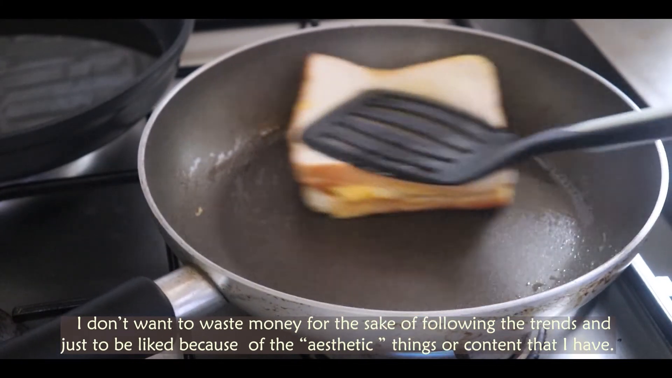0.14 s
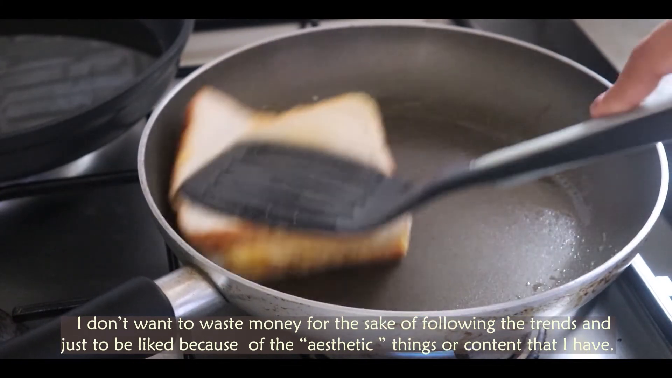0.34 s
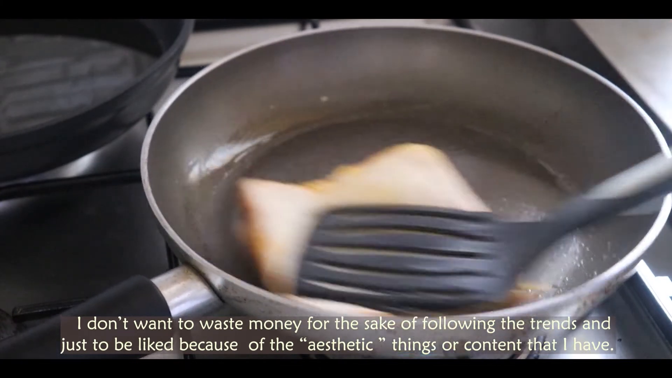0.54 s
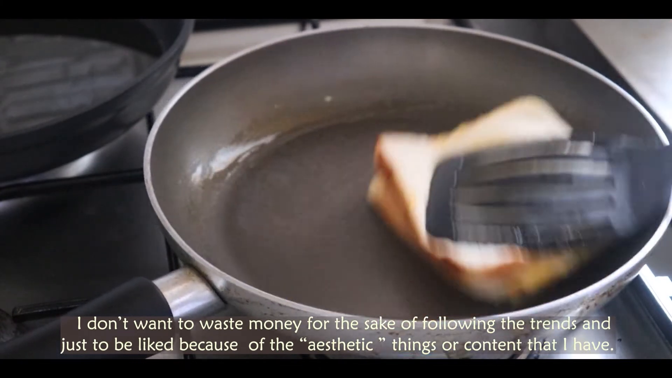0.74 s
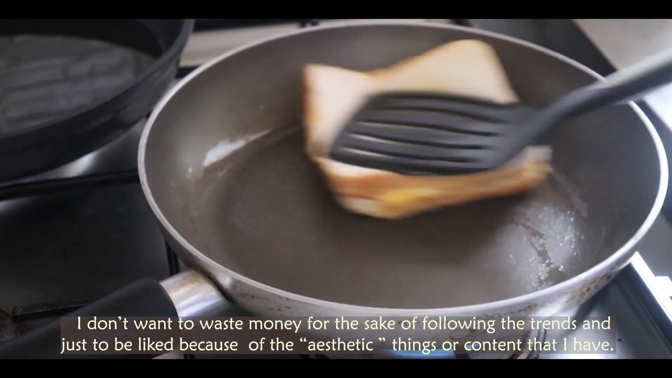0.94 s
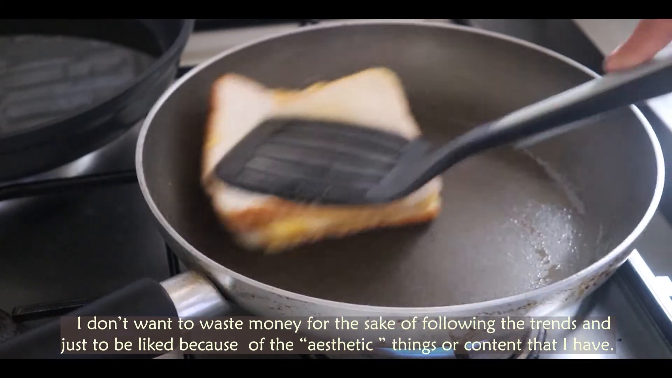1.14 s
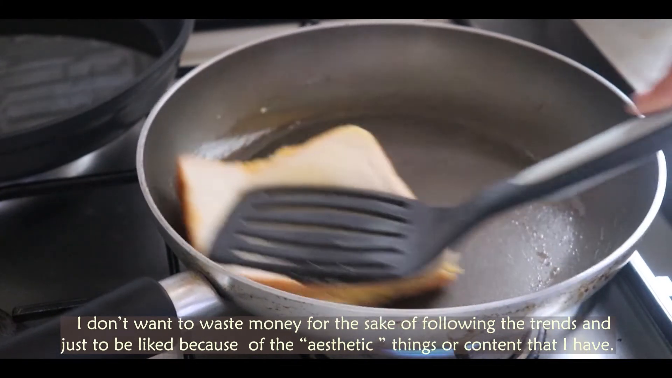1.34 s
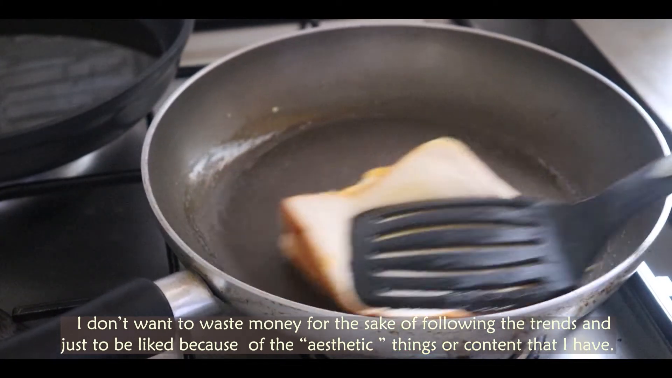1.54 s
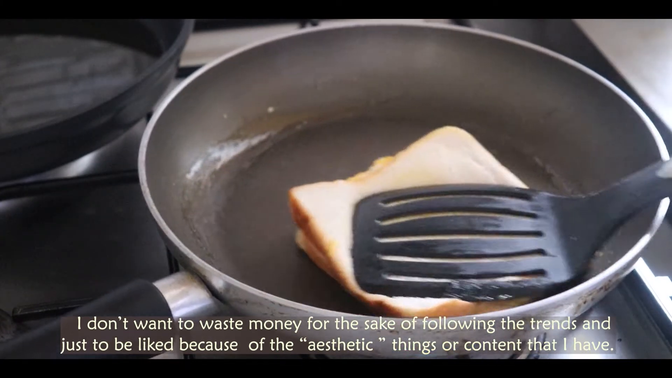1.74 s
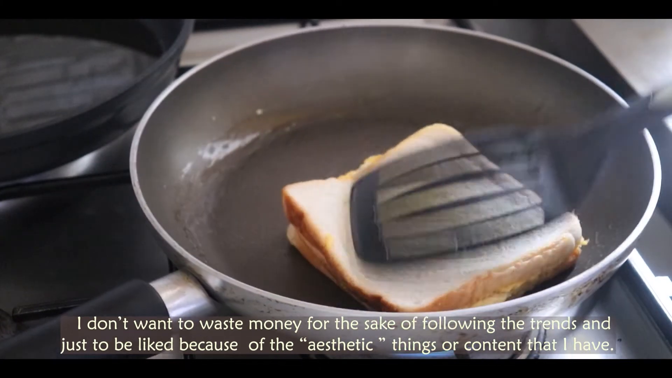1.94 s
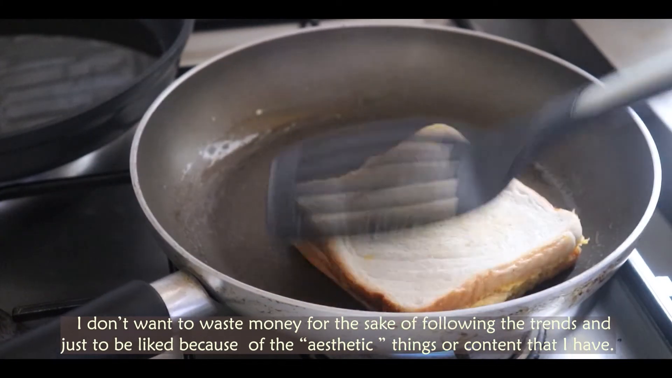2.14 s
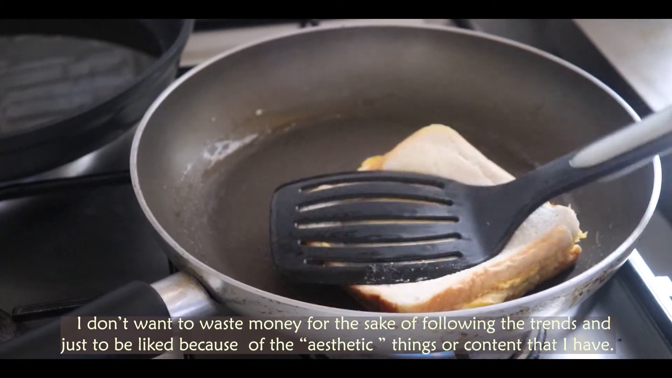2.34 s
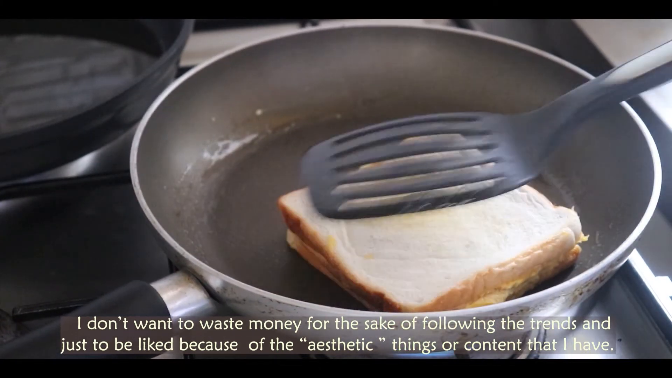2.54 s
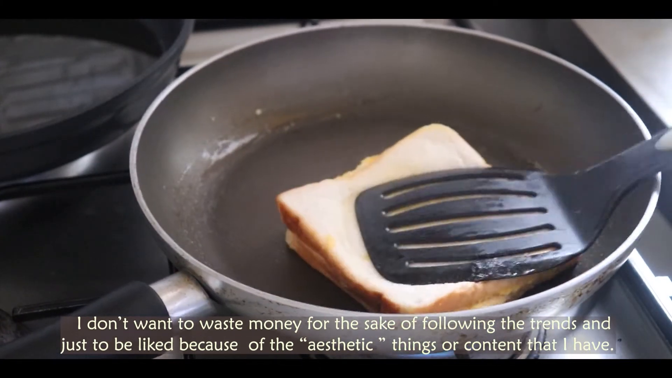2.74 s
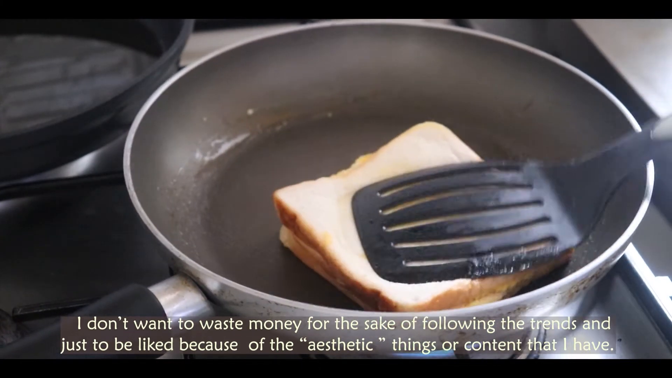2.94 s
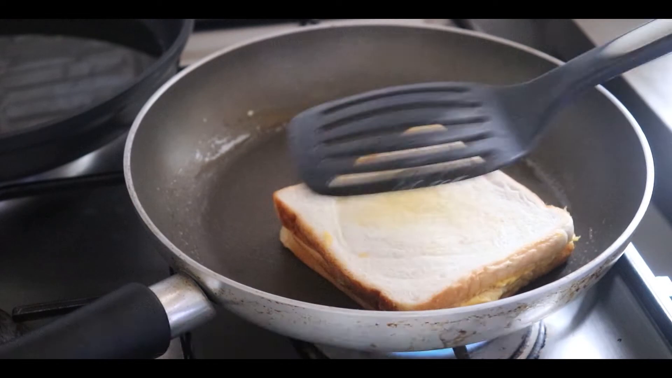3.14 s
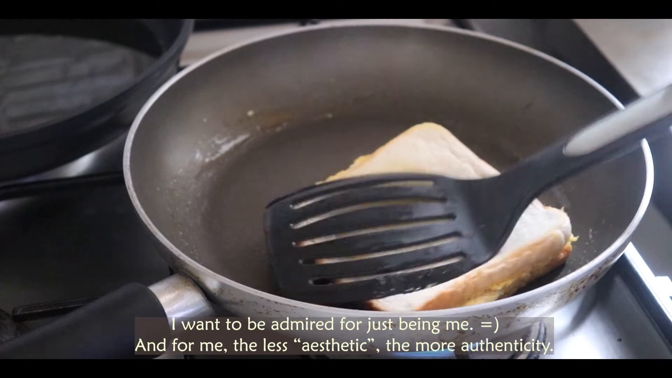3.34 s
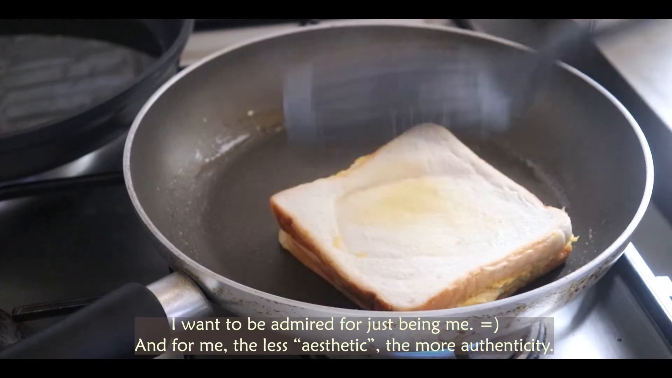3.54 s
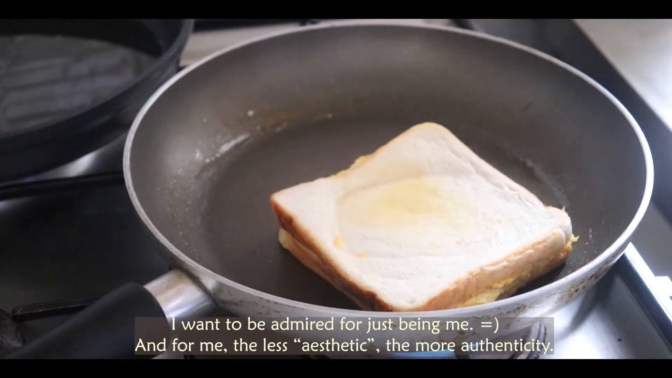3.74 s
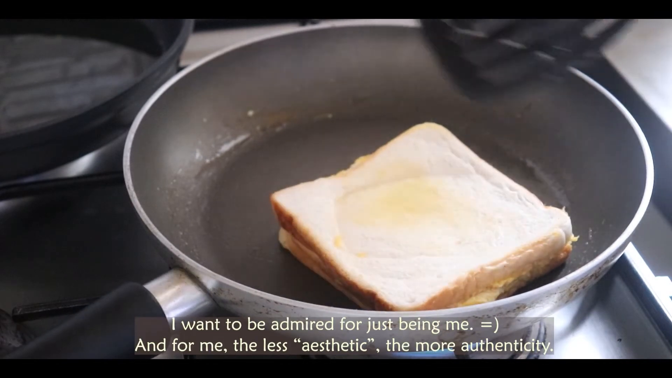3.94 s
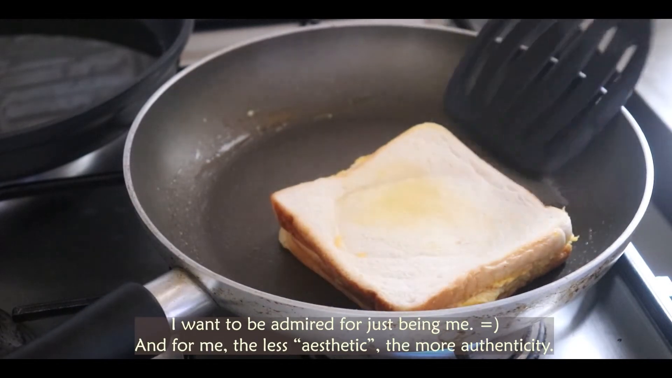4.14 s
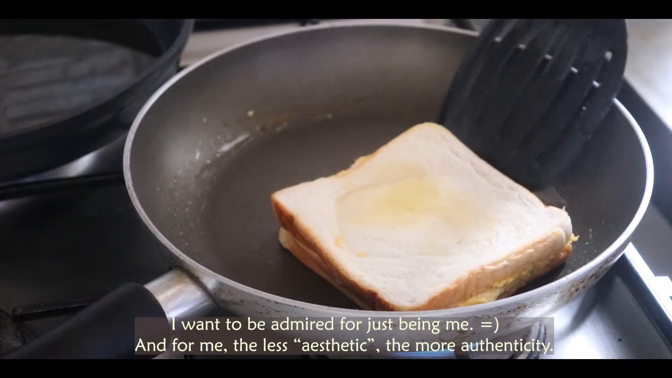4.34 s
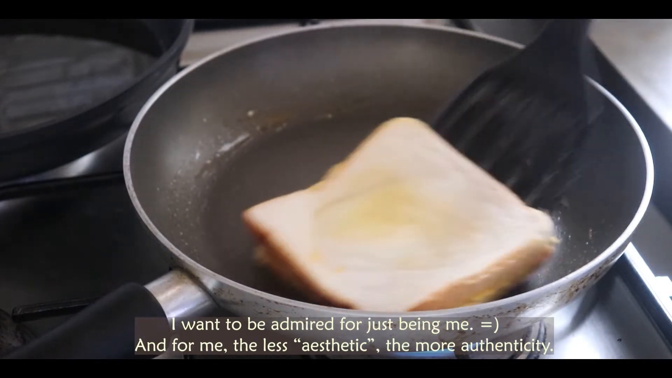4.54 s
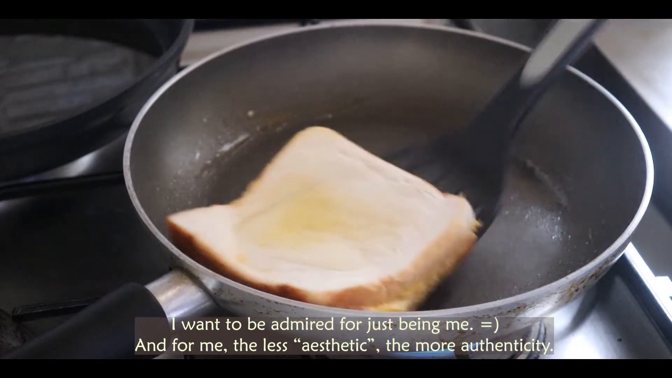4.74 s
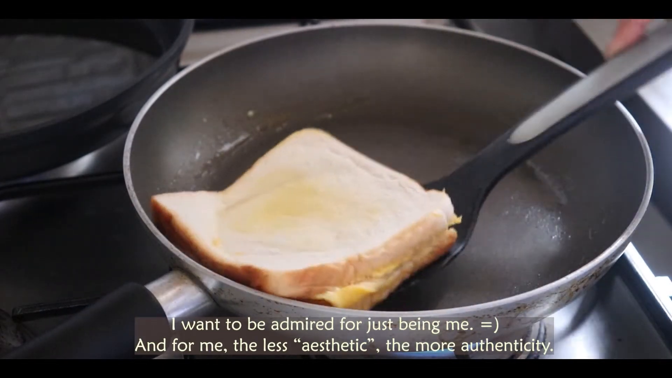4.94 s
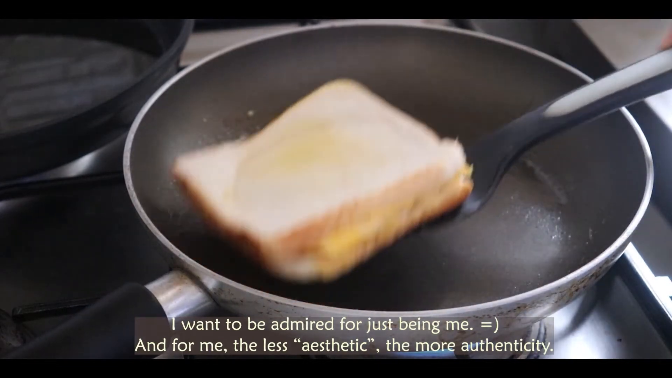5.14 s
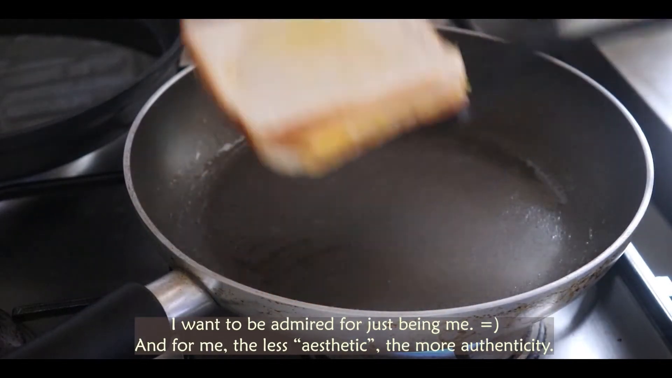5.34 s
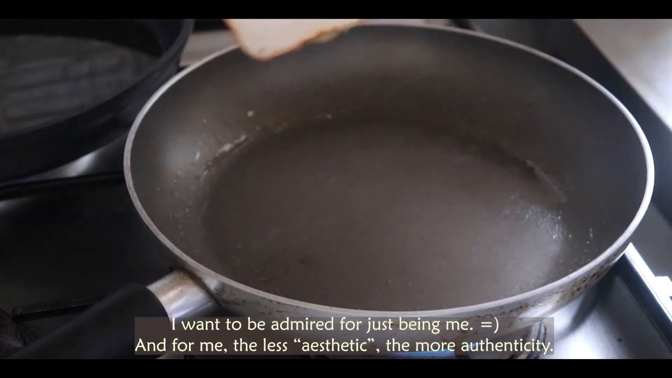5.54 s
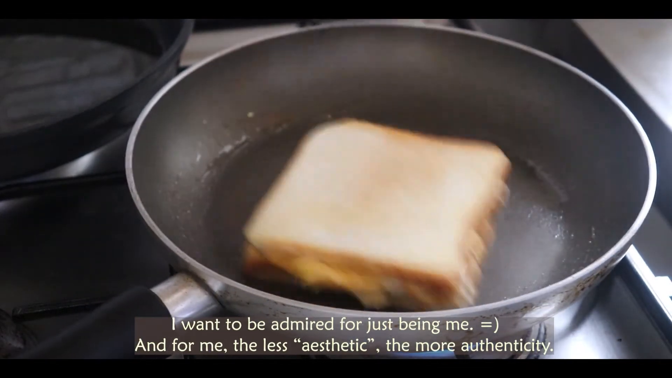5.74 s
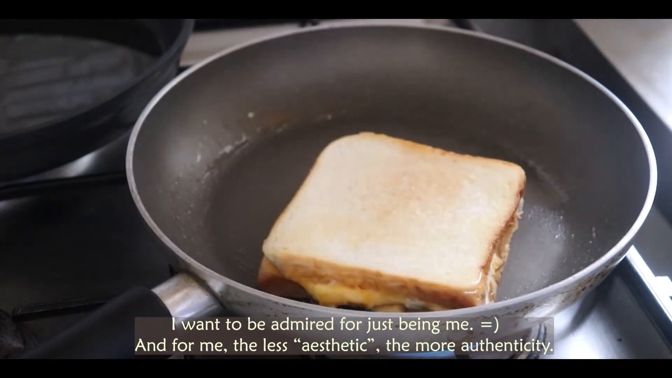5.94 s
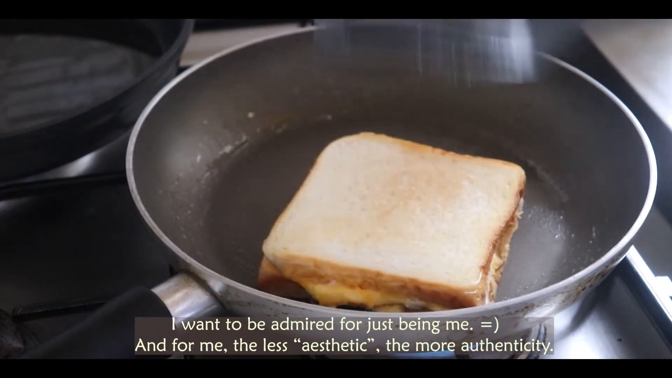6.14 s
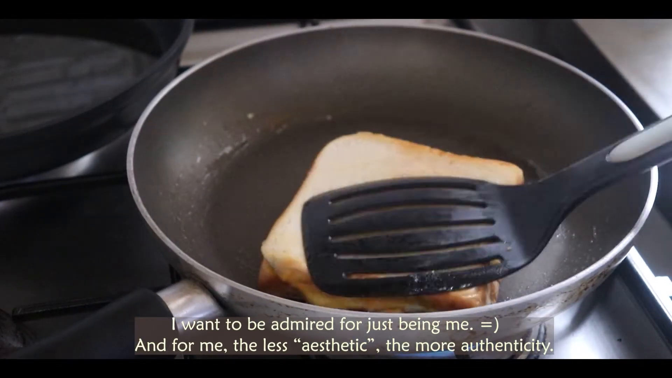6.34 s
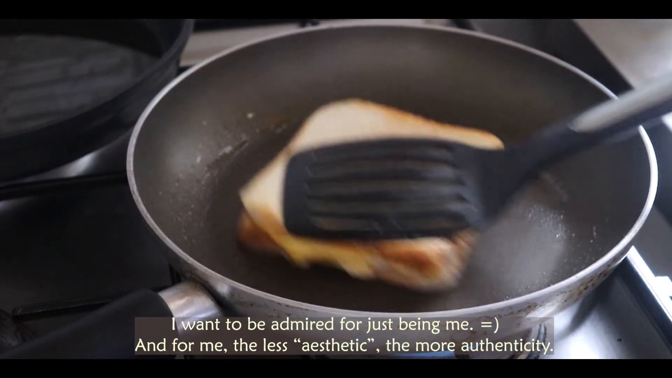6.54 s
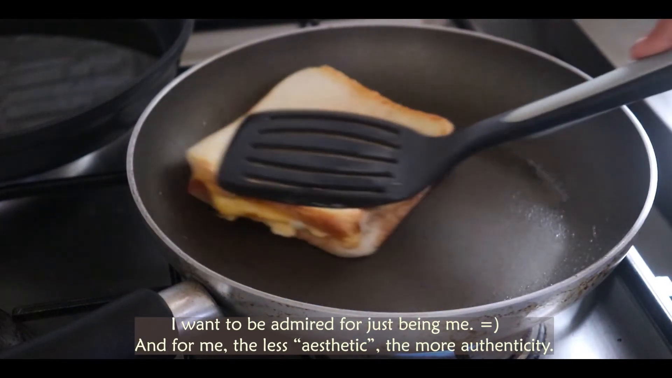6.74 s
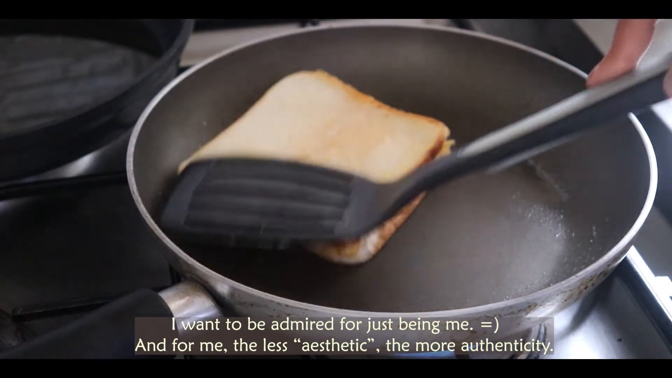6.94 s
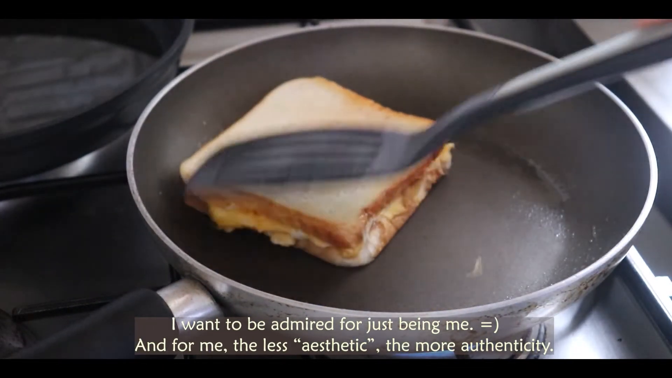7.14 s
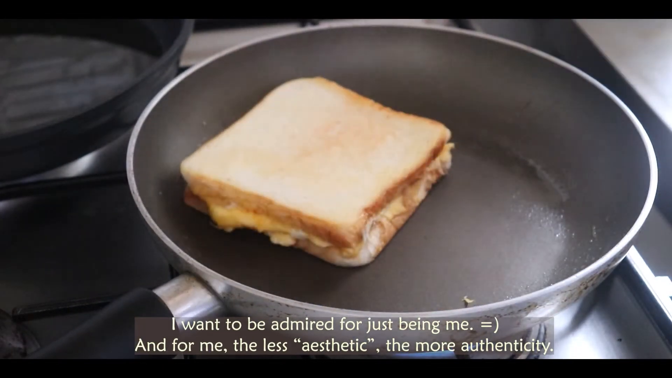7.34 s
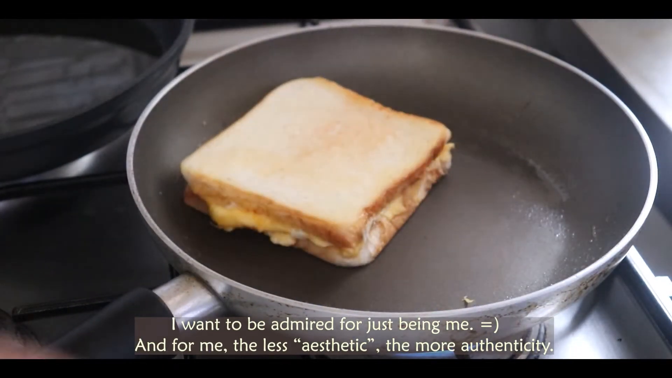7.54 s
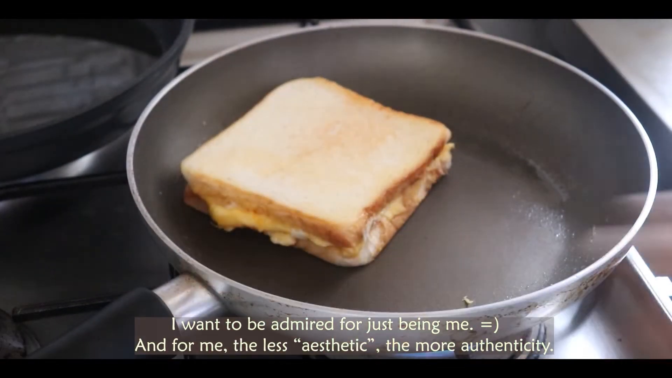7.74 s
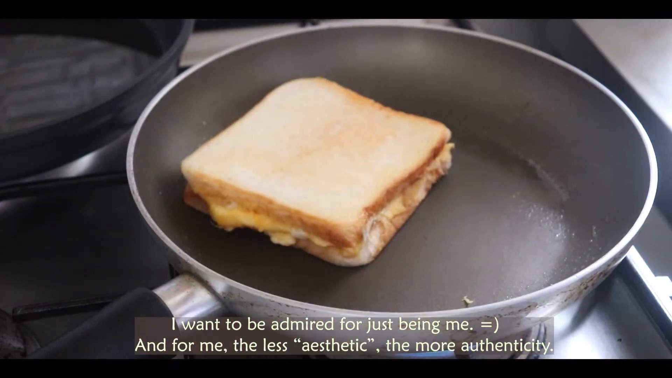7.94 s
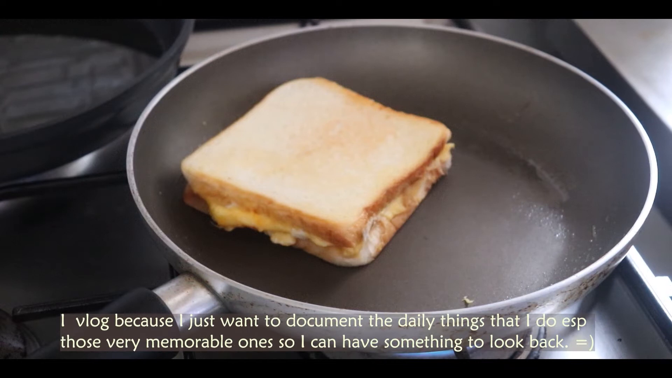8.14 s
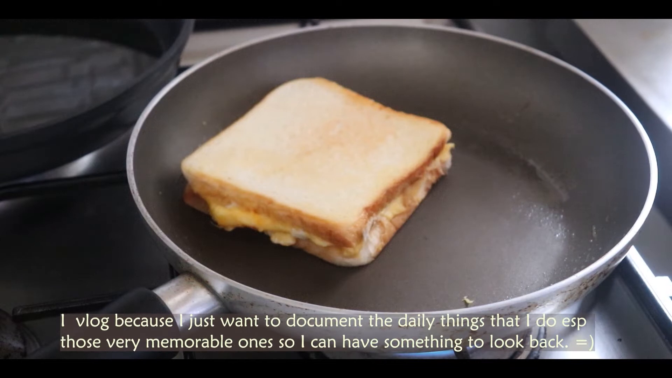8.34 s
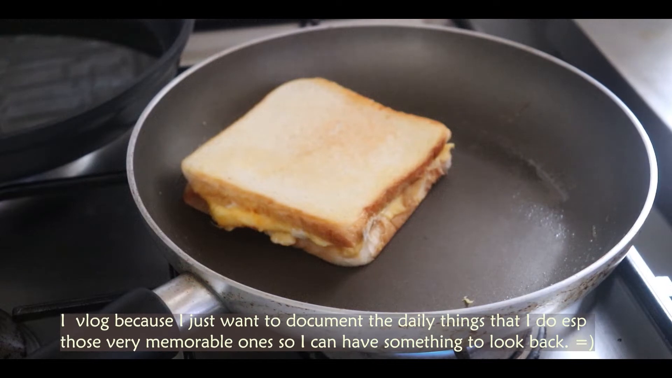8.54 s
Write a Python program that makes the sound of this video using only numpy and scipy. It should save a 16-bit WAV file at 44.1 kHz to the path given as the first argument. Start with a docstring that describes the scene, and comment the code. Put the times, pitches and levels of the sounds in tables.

```python
"""Sandwich frying in a pan

A sandwich fries in butter: filtered noise grains make the sizzle, the sliding bread and the scraping spatula.
Noise bursts ring the pan's resonances for pats and clacks; decaying sine waves make the stove top boom.
The turned bread lands with a dull flop and a wet spatter. A fan adds rushing air and humming sine waves.
Noise tails give the small hard kitchen; the close stereo sound leans slightly left."""
import sys
import numpy as np
from scipy import signal
from scipy.fft import rfft, irfft, next_fast_len
from scipy.io import wavfile
from scipy.ndimage import map_coordinates

SR = 44100
rng = np.random.default_rng(int(sys.argv[2]) if len(sys.argv) > 2 else 0)


def unload_wav(signal):
    """Save mono or channel-first audio to the path in sys.argv[1] as 16-bit WAV at rate SR, clipped to [-1, 1]."""
    wavfile.write(
        sys.argv[1],
        SR,
        np.round(np.clip(np.atleast_2d(signal).T, -1, 1) * 32767).astype(np.int16),
    )


N = 377937
TIME = np.arange(N) / SR  # the whole scene, in seconds
SECOND = np.arange(SR) / SR  # time within one short sound, in seconds

# ringing tones of the pan: pitch_hz [Hz], width_hz [Hz], relative_db [dB]
PAN_MODES = [(519, 15, -12), (660, 25, -4), (702, 14, -7), (823, 29, -7), (939, 43, -7.5),
             (1193, 14, -11.5), (1331, 11.5, -11), (1490, 7.8, -11), (1658, 38, -12.5), (1910, 29, -19.5),
             (2697, 65, -13.5), (3246, 71, -15), (3450, 53, -12), (4185, 120, -17.5), (4590, 27, -14),
             (5160, 14, -10), (5530, 20, -17.5), (6120, 46, -24), (7060, 93, -14), (7600, 40, -19),
             (8840, 72, -17.5)]
# how alike the pan's sound is at left and right: frequency_hz [Hz], likeness [-1 to 1]
PAN_LIKENESS = [(150, 0.98), (500, 0.85), (1100, 0.51), (2000, 0.22), (4000, 0.21), (8000, 0.29),
                (14000, 0)]
# the bread slaps down and spatters: start_s [s], level_db [dB], decay_s [s]
LANDINGS = [(5.7795, -21.5, 0.025)]


def amp(db):
    """Turn decibels into gain."""
    return 10 ** (np.asarray(db) / 20)


def unit(x):
    """Scale to an average (rms) strength of 1."""
    return x / np.sqrt(np.mean(x ** 2) + 1e-20)


def along(points, hz):
    """Read between (Hz, value) points on a logarithmic frequency axis."""
    f, v = np.transpose(points)
    return np.interp(np.log(hz + 1), np.log(f + 1), v)


def wobble(rate):
    """A smooth random curve through this many random points a second."""
    points = rng.standard_normal(int(N * rate / SR) + 4)
    return map_coordinates(points, [TIME * rate])


def add(track, s, sound):
    """Mix a sound into the track at time s."""
    start = max(round(s * SR), 0)
    track[:, start:start + sound.shape[-1]] += sound[..., :N - start]


def filtered(x, response):
    """Reshape a sound by a gain that depends on frequency."""
    n = x.shape[-1]
    m = next_fast_len(n + 8192)  # spare room for the filter's ringing
    return irfft(rfft(x, m) * response(np.fft.rfftfreq(m, 1 / SR)), m)[..., :n]


def causal(points, size=2048):
    """A filter with the (Hz, dB) colour that answers as early as possible (minimum phase)."""
    colour = amp(along(points, np.fft.rfftfreq(size, 1 / SR)))
    cepstrum = irfft(np.log(colour))
    cepstrum[1:size // 2] *= 2
    cepstrum[size // 2 + 1:] = 0
    return irfft(np.exp(rfft(cepstrum)))


def resonances(modes, hz):
    """The summed response of (Hz, width Hz, dB) resonances."""
    return sum(amp(db) * 1j * hz * w / (c * c - hz * hz + 1j * hz * w) for c, w, db in modes)


def spread(pair, alike):
    """Blend two unrelated signals into left and right of the given likeness."""
    def turn(hz):
        return np.arccos(np.clip(along(alike, hz), -1, 1)) / 2
    mid, side = filtered(pair, lambda hz: np.array([np.cos(turn(hz)), np.sin(turn(hz))]))
    return np.array([mid + side, mid - side])


def grains(rate, size_db, share):
    """Tiny bursts of uneven size, rate a second, on a bed of noise; rms 1."""
    bed = rng.standard_normal((2, N))
    sizes = amp(size_db * np.minimum(rng.exponential(size=N), 5))
    bursts = (rng.random(N) < rate / SR) * sizes * rng.standard_normal((2, N))
    return unit(bed + share * unit(bursts))


def room_tail(size=SR):
    """The kitchen's diffuse answer: noise fading at a pace set by frequency, energy 1 per channel."""
    # fading of the kitchen: frequency_hz [Hz], time to drop by 60 dB t60_s [s]
    kitchen = [(100, 1), (300, 1), (800, 0.56), (2000, 0.38), (5000, 0.29), (14000, 0.35)]
    hz, t, z = signal.stft(rng.standard_normal((2, size)), SR, nperseg=256)
    t60 = np.maximum(along(kitchen, hz), .05)[:, None]
    tail = signal.istft(z * amp(-60 * t / t60), SR, nperseg=256)[1][:, :size]
    return unit(tail) / np.sqrt(size)


def swell(s, rise, fall):
    """The speed of one stroke: it grows to 1 at time s and dies away."""
    return np.exp(-((TIME - s) / np.where(TIME < s, rise, fall)) ** 2)


def strokes(rows):
    """Gain of overlapping (s, dB, rise s, fall s) strokes, added in power."""
    return np.sqrt(sum((amp(db) * swell(s, rise, fall)) ** 2 for s, db, rise, fall in rows))


def rub_and_hiss(rows):
    """Each stroke drives a dry rub and, as far as it runs through butter, a hiss."""
    rub = strokes([row[:4] for row in rows])
    hiss = strokes([(s, db + wet_db, rise, fall) for s, db, rise, fall, wet_db in rows])
    return rub, hiss


def friction(colour, modes, rub, hiss, rough, ring_db, split_hz=4800):
    """Slipping grains: a lower rub and a wet hiss, coloured by the pan's resonances."""
    def response(hz):
        ring = amp(ring_db) * resonances(modes, hz) * (1 + hz / 4000)
        return amp(along(colour, hz)) * (1 + ring)
    pair = spread(grains(rate=4000, size_db=4.0, share=rough), PAN_LIKENESS)
    pair = filtered(pair, response)
    low = filtered(pair, lambda hz: 1 / (1 + (hz / split_hz) ** 8))
    unsteady = amp(0.22 * wobble(38))
    return (rub * unit(low) + hiss * unit(pair - low)) * unsteady


def fan():
    """The kitchen fan: noise as rushing air, and sine waves of unsteady strength and phase as hum."""
    # colour of the air: frequency_hz [Hz], relative_db [dB]
    air_colour = [(20, -16), (36, -9), (54, -16), (90, 0), (130, -5), (250, -9), (370, -18), (750, -20),
                  (1500, -26), (2300, -32), (4000, -44), (9000, -70)]
    # left-right likeness of the air: frequency_hz [Hz], likeness [-1 to 1]
    air_likeness = [(60, 1), (180, 0.98), (550, 0.9), (1650, 0.93), (4970, -0.048), (15000, -0.06)]
    # hum tones: pitch_hz [Hz], relative_db [dB]
    hum_tones = [(102.3, -57.5), (140, -57.5), (204.6, -57)]
    air = spread(rng.standard_normal((2, N)), air_likeness)
    air = unit(filtered(air, lambda hz: amp(along(air_colour, hz))))

    def line(hz):
        phase = 2 * np.pi * hz * TIME + .8 * wobble(9)
        return amp(2.5 * wobble(6)) * np.sqrt(2) * np.sin(phase)
    return amp(-41.5) * air + sum(amp(db - 5.5) * line(hz) for hz, db in hum_tones)


def sizzle_level():
    """The sizzle sinks as the bread is prised off, flares as the fresh side lands and settles again."""
    first_side_db, second_side_db = -49, -51.5
    lift_s, fade_s, dip_db = 5.26, 0.43, -3.5
    flare_db, settle_s = 4.5, 1
    since_landing = TIME - LANDINGS[0][0]
    before_db = first_side_db + dip_db * swell(lift_s, fade_s, fade_s)
    after_db = second_side_db + flare_db * np.exp(-np.abs(since_landing) / settle_s)
    return amp(np.where(since_landing < 0, before_db, after_db))


def sizzle():
    """Fine bubbles bursting under the bread are noise grains; a single spit is a very short noise burst."""
    # colour of the bubbles: frequency_hz [Hz], relative_db [dB]
    fizz_colour = [(1000, 2.5), (2500, -5), (4000, -7.5), (7000, -10.5), (11000, -16), (14500, -17),
                   (16000, -53)]
    # single spits of butter: start_s [s], relative_db [dB]
    spit_times = [(2.1615, -43), (3.281, -33.5), (3.331, -32), (4.3996, -33), (6.1123, -40), (6.247, -32.5),
                  (6.333, -34.5), (7.1078, -21.5)]
    fizz = grains(rate=230, size_db=2.0, share=0.42)
    fizz = unit(filtered(fizz, lambda hz: amp(along(fizz_colour, hz))))
    spits = np.zeros((2, N))
    burst = np.exp(-SECOND / 0.0022) * (1 - np.exp(-SECOND / 0.00045))
    for s, db in spit_times:
        add(spits, s, amp(db - 3.0) * (rng.standard_normal((2, SR)) * burst + 4 * room_tail()))
    spit_colour = [(500, -18), (2500, 4.5), (8000, 5.5), (15000, -1)]  # Hz, dB
    spits = filtered(spits, lambda hz: amp(along(spit_colour, hz)))
    return sizzle_level() * fizz + spits


def shifts():
    """The pan's base judders a little way over the iron bars; its rubbing makes the stove top drone."""
    # small moves of the pan: fastest_s [s], level_db [dB], speeding_up_s [s], slowing_down_s [s]
    moves = [(.72, -43, 0.13, 0.22), (3.99, -31, 0.017, 0.069), (4.36, -46, .012, 0.087),
             (6.39, -47.5, 0.074, 0.17), (6.98, -41.5, 0.11, 0.12), (7.36, -39, 0.033, 0.032)]
    # tones of the dragging pan: pitch_hz [Hz], width_hz [Hz], relative_db [dB]
    drag_modes = [(502, 49, 2), (618, 30, 3.5), (780, 59, 5), (935, 68, 1), (1090, 110, 0), (1506, 250, 2),
                  (1980, 160, 0), (2806, 540, -12)]
    judder = spread(grains(rate=540, size_db=3, share=0.68), PAN_LIKENESS)
    judder = filtered(judder, lambda hz: resonances(drag_modes, hz) / (1 + (hz / 6000) ** 2))
    drag = strokes(moves) * unit(judder)
    echo = signal.fftconvolve(drag, room_tail(), axes=1)[:, :N]
    drone_db, sag_db_per_s, end_s, fade_s = -41.5, -16.5, 0.65, 0.027
    level = amp(drone_db + sag_db_per_s * TIME) * np.clip((end_s - TIME) / fade_s, 0, 1)
    drone = spread(rng.standard_normal((2, N)), PAN_LIKENESS)
    drone = unit(filtered(drone, lambda hz: resonances([(230, 33, 0)], hz) ** 2))
    return drag + amp(-7) * echo + level * drone


def slides():
    """The pressed bread skates round the buttered pan: gritty noise that swells with each push."""
    # pushes: fastest_s [s], relative_rub_db [dB], speeding_up_s [s], slowing_down_s [s], hiss_over_rub_db [dB]
    pushes = [(0.1, -41, 0.081, 0.18, 0.5), (0.39, -34.5, 0.16, 0.14, 1.5), (0.61, -33, 0.1, 0.082, -2.5),
              (0.8, -39, 0.15, 0.16, 2), (1.03, -37.5, 0.15, 0.14, 1), (1.29, -35, 0.16, 0.1, 0),
              (1.53, -35.5, 0.14, 0.16, -4), (1.89, -44.5, 0.062, 0.042, -6),
              (2.27, -51.5, 0.026, 0.059, -6), (3.805, -43.5, 0.024, .03, -2.5),
              (6.395, -48, 0.03, 0.024, -2.5), (6.56, -44, 0.047, 0.21, 0.5), (6.72, -46.5, 0.18, 0.18, 0),
              (6.99, -38.5, 0.14, 0.061, 1), (7.15, -49, 0.027, 0.048, -8), (7.345, -51.5, 0.036, 0.022, 2)]
    # colour of the rubbing: frequency_hz [Hz], relative_db [dB]
    slide_colour = [(240, -63), (400, -5.5), (753, -5), (801, -3), (1010, -3), (1460, 3), (3930, -1),
                    (4110, -2.5), (4950, -4), (5430, -5.5), (8630, -14), (13700, -20.5), (16000, -24)]
    # pan tones that rubbing wakes: pitch_hz [Hz], width_hz [Hz], relative_db [dB]
    rub_modes = [(2000, 110, -9), (2964, 150, -2), (3300, 50, 0), (3580, 16, 3.5), (4194, 51, 1.5),
                 (5440, 37, -1.5), (6870, 150, -8), (7430, 61, -4), (8160, 33, -4), (8670, 120, -0.5),
                 (10100, 52, -2), (11800, 140, -7)]
    rub, hiss = rub_and_hiss(pushes)
    return friction(slide_colour, rub_modes, amp(2) * rub, amp(2) * hiss, rough=0.6, ring_db=-3.0)


def strike(contact, spot_hz, spot_db, snap, room_db, size=SR):
    """One blow: a snap and a brief chatter of pan on grate ring the pan and the room."""
    t = np.arange(size) / SR
    burst = np.exp(-t / contact) * (1 - np.exp(-t / (contact / 4)))
    chatter = unit(rng.standard_normal((2, size)) * burst) / np.sqrt(size)
    room_colour = [(900, 1.9), (2500, 0.78), (7000, -1)]  # Hz, dB
    room = filtered(room_tail(), lambda hz: amp(along(room_colour, hz)))
    force = spread(chatter + amp(room_db) * room, PAN_LIKENESS)
    force[:, 8] += snap * np.exp(-(contact / 0.0046) ** 2)  # longer contacts start with less snap

    def response(hz):
        spot = 1 + amp(spot_db) * resonances([(spot_hz, 120 + spot_hz / 20, 0)], hz)
        pan = 1 + amp(11) * resonances(PAN_MODES, hz) * (1 + hz / 2500)
        return spot * pan
    return filtered(force, response)


def blow_colour(db, contact, hardness_db):
    """Levels of thud, body, ring and crack: long contacts thud, hard ones ring and crack."""
    thud_db = -16 + 8 * np.log2(contact / .005)  # 8 dB more for each doubling of the contact time
    ring_db = 1 + 0.32 * hardness_db
    crack_db = -13 + hardness_db
    return db + np.array([thud_db, 0, ring_db, crack_db])


def knocks(size=882):
    """Blows on the pan, each coloured by where and how hard it is hit."""
    # blows: start_s [s], relative_db [dB], contact_s [s] (at least 1 ms is used), hardness_db [dB],
    # spot_hz [Hz], spot_lift_db [dB]; the struck spot favours the resonance at spot_hz
    blows = [(0.643, -31.5, 0.018, 10.5, 1730, -9), (0.658, -24, 0.00057, 6.5, 1750, 10.5),
             (0.719, -32.5, 0.0098, 11.5, 1260, 2), (0.858, -19, 0.002, 7, 900, 8),
             (1.5597, -27.5, 0.008, 11.5, 4580, 9), (1.954, -18, 0.0013, 3, 2730, 6),
             (1.9945, -22.5, .0035, -1, 2700, -5), (2.419, -28.5, 0.0038, -23, 2720, 4),
             (2.439, -35, 0.0039, -16, 2650, 4), (2.852, -39.5, 0.031, -5.5, 1210, 9),
             (3.0479, -19.5, 0.0032, -11.5, 2710, 7), (3.084, -23.5, 0.0025, -5, 1280, -19),
             (3.811, -31.5, 0.0057, 16.5, 685, 19), (3.8627, -24, 0.0036, -5, 2720, -2),
             (3.974, -38.5, 0.0071, -7, 610, 14), (4.347, -45.5, 0.014, -17, 625, 23),
             (5.755, -31, 0.015, 14, 3200, 8), (5.7791, -22, 0.0064, 4, 485, 9),
             (5.8143, -18, 0.0066, -8.5, 1270, -7), (6.595, -26.5, 0.0052, -7, 910, 3),
             (7.366, -25.5, 0.0038, 2, 920, 7)]
    # bands of thud, body, ring and crack: low_hz [Hz], high_hz [Hz]
    band_edges = [(160, 500), (500, 2000), (2000, 5000), (5000, 15000)]
    out = np.zeros((2, N))
    hz = np.fft.rfftfreq(4 * size, 1 / SR)
    bands = np.array([(hz > lo) & (hz < hi) for lo, hi in band_edges])
    centres = np.sqrt(np.prod(band_edges, axis=1))
    body = causal([(60, -11), (300, -4), (700, -3.5), (1700, 2.5), (2200, -2.5), (3500, -5),
                   (5500, -8), (9000, -14.0), (15000, -33.0)])  # Hz, dB
    for s, db, contact, hardness_db, spot_hz, spot_db in blows:
        contact = max(contact, .001)
        tail_db = 0.5 + 0.42 * (db + 21)  # lighter taps sound drier
        blow = strike(contact, spot_hz, spot_db, snap=1.19, room_db=tail_db)
        blow = signal.fftconvolve(blow, body[None])
        # compare the first 20 ms with the wanted colour, then correct each band
        power = np.mean(np.abs(rfft(blow[:, :size], 4 * size)) ** 2, axis=0) / size
        attack_db = 10 * np.log10(np.mean(bands * power, axis=1))
        correction_db = blow_colour(db, contact, hardness_db) - attack_db
        correction = causal(list(zip(centres, correction_db)))
        add(out, s, signal.fftconvolve(blow, correction[None]))
    return amp(1.47) * out


def ringing(modes, attack, vary_db, size=SR):
    """Decaying sine waves with fresh random strengths and phases."""
    t = np.arange(size) / SR
    total = np.zeros(size)
    for (hz, db, t60), (a, b) in zip(modes, rng.standard_normal((len(modes), 2))):
        decay = np.exp(-np.log(1000) * t / t60)
        total += amp(db + vary_db * a) * decay * np.sin(2 * np.pi * (hz * t + b))
    return total * (1 - np.exp(-(t / attack) ** 2))


def stove():
    """Under the pan's weight the sheet-metal top and the room's low modes swell over a ragged thud."""
    # the pan's weight comes down: start_s [s], relative_db [dB]
    booms = [(0.65, -25), (0.901, -29.5), (1.56, -27), (1.959, -25.5), (2.418, -38), (2.852, -33.5),
             (3.07, -26.5), (3.811, -28.5), (4.154, -39), (5.78, -25.5), (6.594, -37.5), (7.366, -33.5)]
    # low, then upper modes: pitch_hz [Hz], relative_db [dB], time to drop by 60 dB t60_s [s]
    low_modes = [(83, -14, 0.83), (92.64, -5, 0.98), (109.85, -0.5, 0.77), (148, -14, 0.99)]
    upper_modes = [(219, 4, 0.91), (253.3, 1, 1), (296.7, -1.5, 1), (341.4, -4, 0.56), (386, -9, 1),
                   (435, -3.5, 1), (470.5, -2.5, 0.68), (517, -9, .4)]
    # colour of the thud's crowded short modes: frequency_hz [Hz], relative_db [dB]
    thud_colour = [(70, -19), (100, 7), (170, -7), (300, -2.5), (480, -16.5), (700, -24), (1500, -47)]
    out = np.zeros((2, N))
    thud_shape = amp(-60 * SECOND / 0.72) * (1 - np.exp(-(SECOND / 0.019) ** 2))
    for s, db in booms:
        thud = spread(rng.standard_normal((2, SR)), PAN_LIKENESS)
        thud = unit(filtered(thud, lambda hz: amp(along(thud_colour, hz))))
        add(out, s, amp(db - 0.3) * thud * thud_shape)
        add(out, s, amp(db + 5) * ringing(low_modes, attack=0.051, vary_db=3))
        add(out, s, amp(db - 7.5) * ringing(upper_modes, attack=0.023, vary_db=4.0))
    return out


def rim():
    """A light touch of the spatula gives a dry tick of noise and a faint ting of the rim."""
    # touches: start_s [s], relative_db [dB]
    touches = [(4.154, -34.5)]
    # the rim's modes: pitch_hz [Hz], relative_db [dB], time to drop by 60 dB t60_s [s]
    rim_modes = [(2635, -4, 0.4), (4269, 0, 0.17), (5300, -7, 0.12), (5870, 4, 0.14)]
    tick_colour = [(500, -4), (2500, 6.5), (5800, 5), (8000, -2), (15000, -20)]  # Hz, dB
    out = np.zeros((2, N))
    for s, db in touches:
        touch = rng.standard_normal((2, SR)) * np.exp(-SECOND / 0.0049) + 6 * room_tail()
        tick = filtered(touch, lambda hz: amp(along(tick_colour, hz)))
        left = ringing(rim_modes, attack=.001, vary_db=-0.5)
        right = ringing(rim_modes, attack=.001, vary_db=2)
        add(out, s, amp(db + 7.5) * tick + amp(db - 3) * np.array([left, right]))
    return out


def scrape():
    """The spatula's edge drags on the coating in uneven slips and squeaks in narrow bands of noise."""
    # shoves under the bread: fastest_s [s], relative_scrape_db [dB], speeding_up_s [s], slowing_down_s [s],
    # hiss_over_scrape_db [dB]
    shoves = [(4.505, -41, 0.044, 0.063, -2.5), (4.63, -38, 0.078, 0.093, -3),
              (4.83, -35.5, 0.12, 0.095, -7.5), (5.06, -52.5, 0.21, 0.12, -5)]
    # colour of the scraping: frequency_hz [Hz], relative_db [dB]
    scrape_colour = [(180, -32), (300, 3), (337, -11), (511, -0.5), (762, -9), (946, -0.5), (2520, -1),
                     (3130, -1.5), (12300, -23), (16000, -28)]
    # squeaks: loudest_s [s], level_db [dB], rise_and_fall_s [s], pitch_hz [Hz]
    squeak_rows = [(4.505, -43, .015, 3260), (4.655, -37, 0.054, 3240), (4.855, -40, .025, 3260),
                   (5.05, -60, 0.079, 7330), (7.345, -52, .04, 6100)]

    def line(pitch):
        noise = rng.standard_normal((2, N))
        return unit(filtered(noise, lambda hz: resonances([(pitch, 20, 0)], hz) ** 2))
    rub, hiss = rub_and_hiss(shoves)
    squeaks = sum(amp(db) * swell(s, length, length) * line(pitch) for s, db, length, pitch in squeak_rows)
    drag = friction(scrape_colour, PAN_MODES, amp(2) * rub, amp(2) * hiss, rough=0.44, ring_db=6.5)
    slips = amp(0.52 * wobble(110))
    return slips * (drag + squeaks)


def splats():
    """The bread lands on hot metal: its soft weight is a dull noise burst, the spatter a bright one."""
    # colour of the soft weight: frequency_hz [Hz], relative_db [dB]
    flop_colour = [(120, -15), (300, -5), (520, 6), (800, -7), (1600, -25), (4000, -52)]
    spray_colour = [(3000, -25), (8000, 4), (12000, 8), (16000, 3)]  # Hz, dB
    flop_over_spray_db, flop_decay_s = 8, 0.022
    out = np.zeros((2, N))
    for s, db, decay in LANDINGS:
        spray = rng.standard_normal((2, SR))
        spray = unit(filtered(spray, lambda hz: amp(along(spray_colour, hz))))
        flop = spread(rng.standard_normal((2, SR)), PAN_LIKENESS)
        flop = unit(filtered(flop, lambda hz: amp(along(flop_colour, hz))))
        burst = spray * np.exp(-SECOND / decay)
        burst += amp(flop_over_spray_db) * flop * np.exp(-SECOND / flop_decay_s)
        add(out, s, amp(db) * burst * (1 - np.exp(-SECOND / .001)))
    return out


def chirr():
    """A thin chirr near 3 kHz, made of narrow bands of noise, swells a few times."""
    # swells: loudest_s [s], level_db [dB]
    chirr_swells = [(7.877, -52.5), (8.05, -54), (8.27, -55), (8.493, -53.5)]
    # its bands: pitch_hz [Hz], width_hz [Hz], relative_db [dB]; the response is squared below
    chirr_modes = [(2590, 120, -5.5), (2730, 120, -5), (2925, 130, -2.5)]
    swell_s = 0.082  # rise and fall of each swell
    level = strokes([(s, db, swell_s, swell_s) for s, db in chirr_swells])
    noise = rng.standard_normal((2, N))
    return level * unit(filtered(noise, lambda hz: np.abs(resonances(chirr_modes, hz)) ** 2))


def scene():
    """Everything stands slightly to the left, so that side hears it a touch earlier and louder."""
    mix = fan() + sizzle() + shifts() + slides() + knocks() + stove() + rim() + scrape() + splats() + chirr()
    sides = np.array([[1], [-1]])
    shifted = filtered(mix, lambda hz: np.exp(1j * np.pi * hz * 2e-5 * sides))  # left leads by 20 microseconds
    return shifted * amp(.5 * sides)


def record(dry):
    """Peaks beyond full scale are cut flat, then everything from 16 kHz up is removed."""
    clipped = np.clip(dry, -1, 1)
    return filtered(clipped, lambda hz: hz < 16000)


dry = scene()
out = record(dry)
unload_wav(out)
```